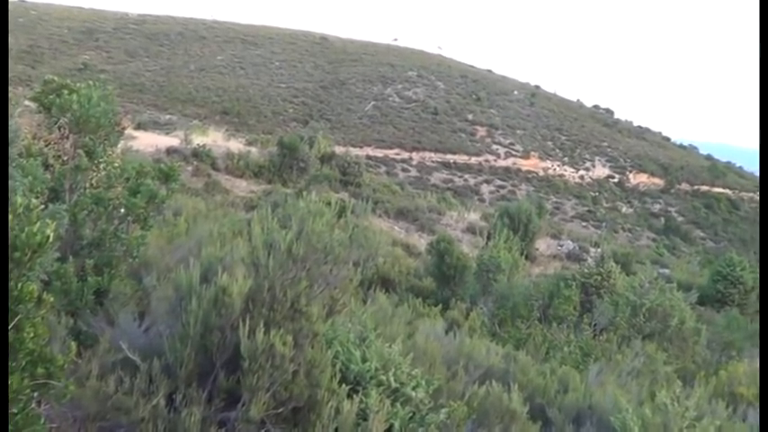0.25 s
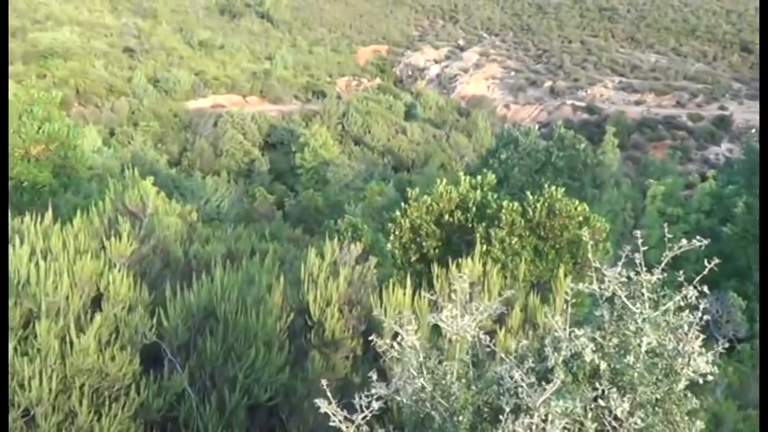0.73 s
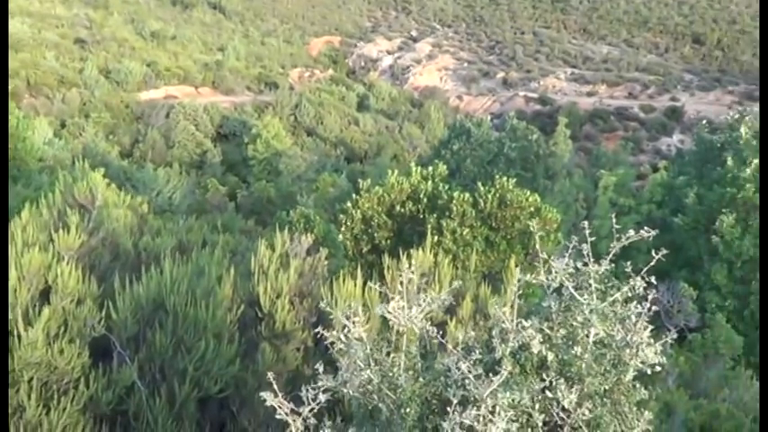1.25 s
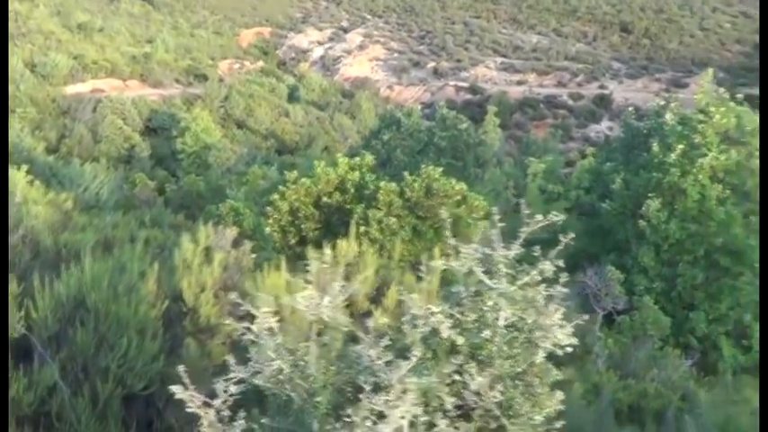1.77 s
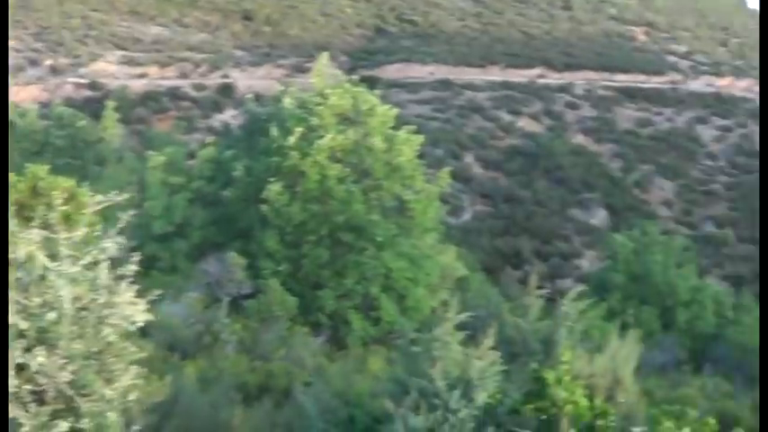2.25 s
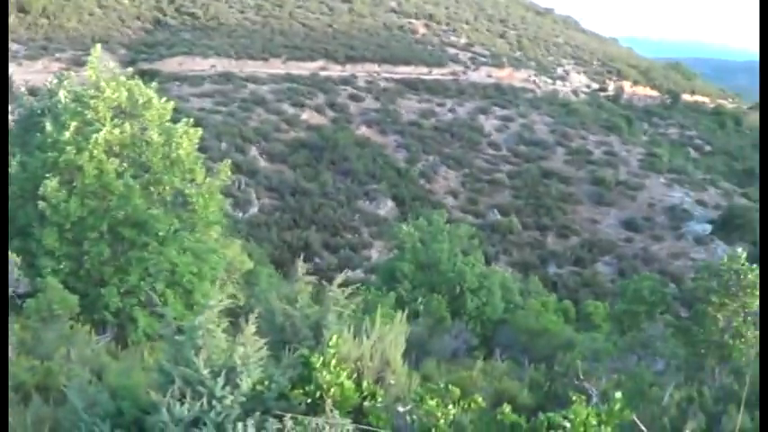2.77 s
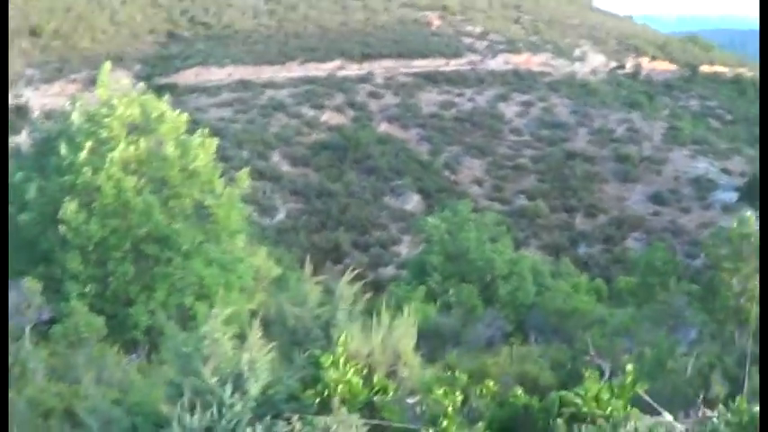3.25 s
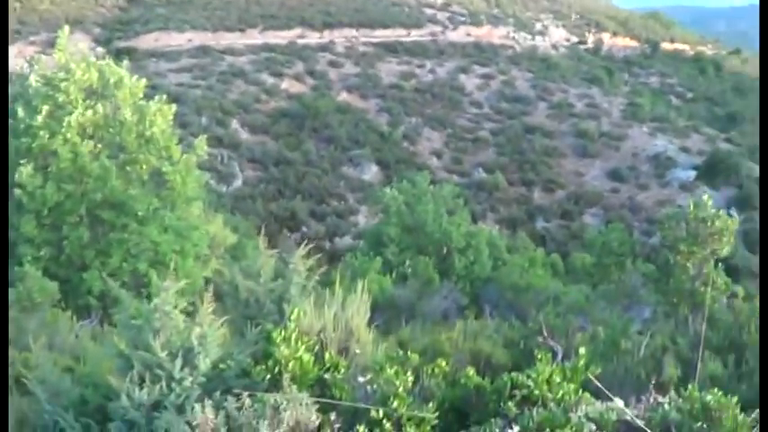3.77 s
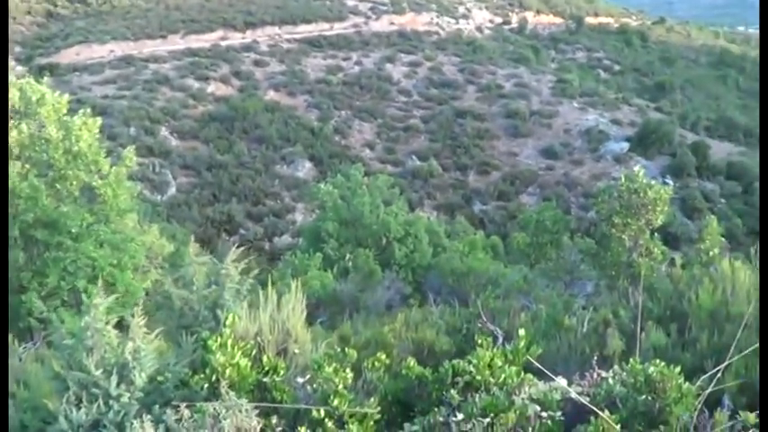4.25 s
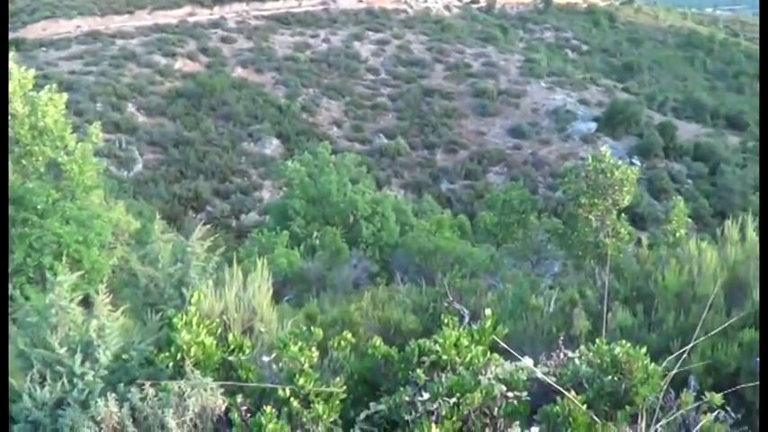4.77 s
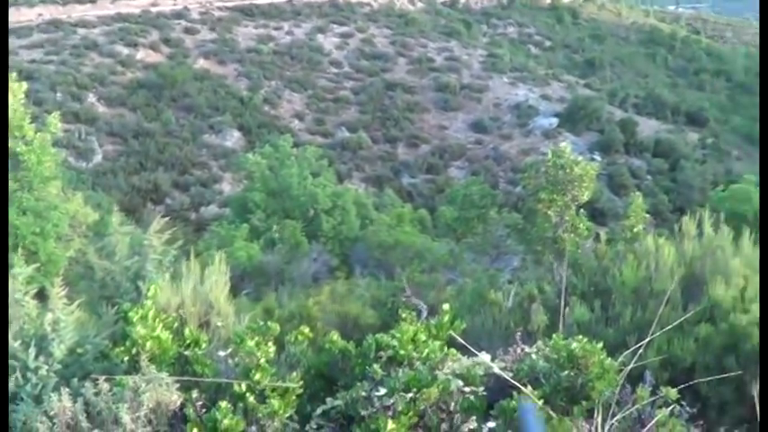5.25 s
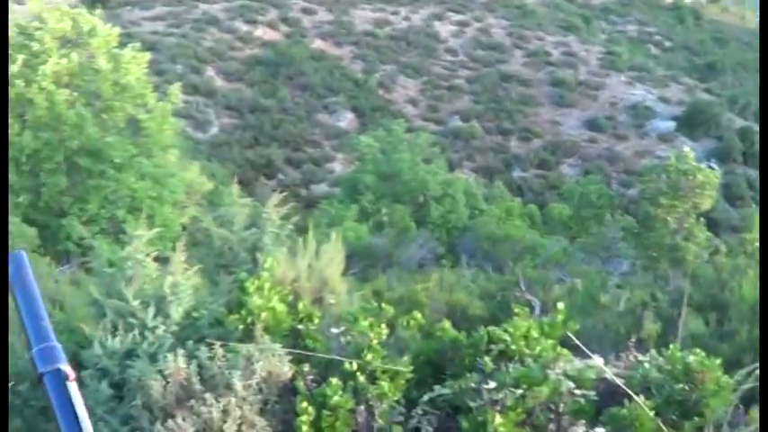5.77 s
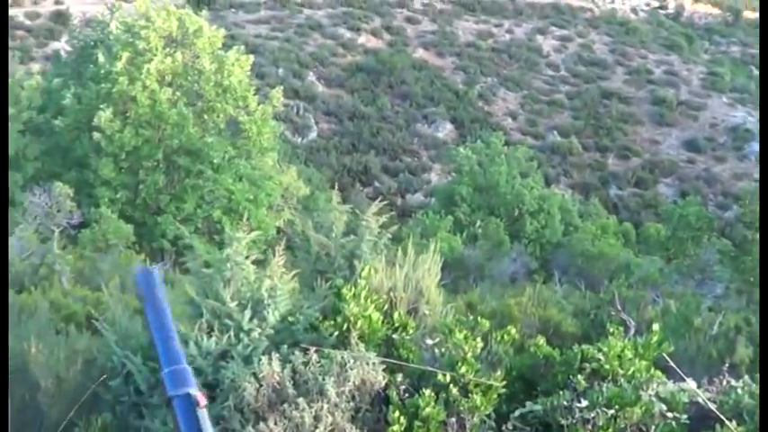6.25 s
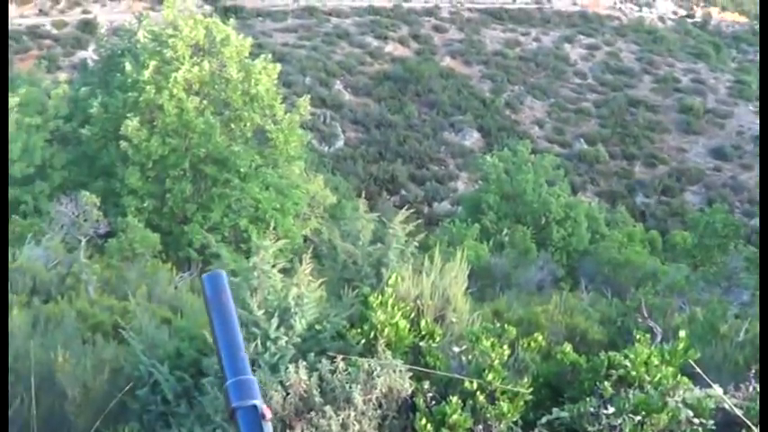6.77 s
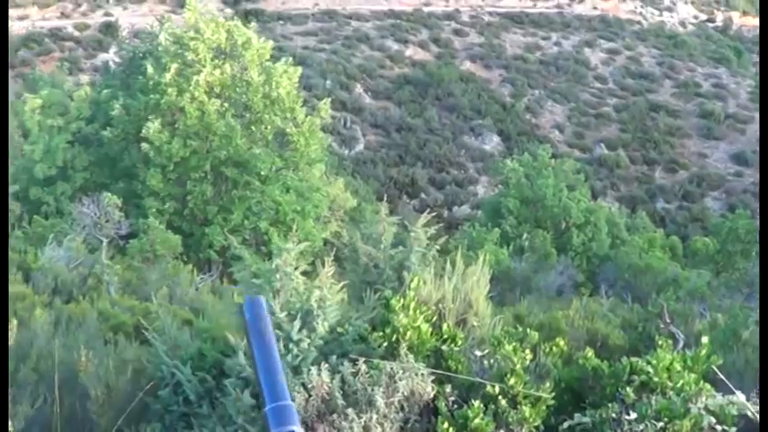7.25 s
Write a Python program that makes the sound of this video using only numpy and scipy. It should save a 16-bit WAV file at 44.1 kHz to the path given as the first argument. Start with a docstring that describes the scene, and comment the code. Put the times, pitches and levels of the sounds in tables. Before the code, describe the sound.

Hunting hounds give tongue on an open hillside. Short, gliding, almost whistled yelps sound singly, then crowd together from the middle onward, joined by lower, raspy bays. Collar bells jingle lightly among them. A handheld camera microphone catches low wind buffeting early, leaves brushing and sharp twig cracks in clusters, a few soft knocks, faint hiss and a very high thin whine. Sparse echoes die quickly off the slope.

```python
"""Hounds give tongue on a scrubby hillside: high yelps, sparse at first, then overlapping with hoarse bays.
Yelps are gliding tones with ragged overtones; bays add half-multiple lines, throat flap and breath.
Collar bells ring as struck modes, small birds whistle; a sparse decaying echo returns from the slope.
Shaped noise makes wind gusts, handling rumble, brush, twigs and hiss; a camera whine pulses thinly."""
import sys
import numpy as np
from scipy import signal
from scipy.fft import rfft, irfft, next_fast_len
from scipy.io import wavfile
from scipy.ndimage import map_coordinates

SR = 44100
rng = np.random.default_rng(int(sys.argv[2]) if len(sys.argv) > 2 else 0)


def file_out(sig):
    """Save sig as 16-bit WAV at sys.argv[1]."""
    # one column per channel
    cols = np.atleast_2d(sig).T
    # limit, then scale
    lim = np.clip(cols, -1, 1)
    pcm = np.round(lim * 32767).astype(np.int16)
    wavfile.write(sys.argv[1], SR, pcm)


N = 331632
TIME = np.arange(N) / SR
STEP_S = 0.365  # background level steps up here and the whine sets in

# Spectrum of snapping twigs and dry crackle. Each row: frequency in Hz, gain in dB.
SNAP_SPECTRUM = [(200, -1.5), (1000, 8.5), (2500, 5.5), (5000, -2.5), (8500, 0), (12000, -5), (17000, -38)]


def amp(db):
    """Decibels to gain."""
    return 10 ** (np.asarray(db) / 20)


def unit(x):
    """Scales to rms 1."""
    return x / np.sqrt(np.mean(x ** 2) + 1e-20)


def read(points, hz):
    """Reads a spectrum on a log-frequency axis."""
    f, value = np.transpose(points)
    return np.interp(np.log(hz + 1), np.log(f + 1), value)


def add(mix, start_s, sound):
    """Lays a sound into the mix at start_s."""
    part = mix[max(round(start_s * SR), 0):][:len(sound)]
    part += sound[:len(part)]


def colour(x, points):
    """Filters by a spectrum of (Hz, dB) points."""
    length = x.shape[-1]
    n = next_fast_len(length)
    gain = amp(read(points, np.fft.rfftfreq(n, 1 / SR)))
    return irfft(rfft(x, n) * gain, n)[..., :length]


def wander(n, rate_hz):
    """Smooth chance of rms about 1, with rate_hz random knots a second."""
    knots = rng.standard_normal(4096)
    return map_coordinates(knots, [np.arange(n) * rate_hz / SR], order=3, mode="wrap")


def drift(n, rate_hz):
    """Randomly turning, swelling phasor of rms about 1: smears a line over about rate_hz."""
    return (wander(n, rate_hz) + 1j * wander(n, rate_hz)) / np.sqrt(2)


def ring(modes, t, uneven_db=3):
    """Dying modes of a struck thing, excited and detuned differently by every blow."""
    out = 0
    for hz, db, t60_s in modes:
        level_chance, pitch_chance = rng.standard_normal(2)
        decay = amp(db + uneven_db * level_chance - 60 * t / t60_s)
        out = out + decay * np.sin(2 * np.pi * hz * (1 + 0.0043 * pitch_chance) * t)
    return out


def noise_pair(points):
    """Coloured stereo noise of rms 1; the side-to-mid ratio sets left-right likeness by frequency."""
    # Likeness of the two microphone ports. Each row: frequency in Hz, left-right correlation 0-1.
    port_likeness = [(30, 0.98), (120, 0.48), (280, 0.06), (700, 0.09), (2000, 0.49), (8000, 0.84),
                     (12000, 0.99)]
    mid, side = rng.standard_normal((2, N))
    side_db = [(hz, 10 * np.log10((1.0001 - min(c, 1)) / (1 + c))) for hz, c in port_likeness]
    side = colour(side, side_db)
    return unit(colour(np.array([mid + side, mid - side]), points))


def air():
    """Steady open-air background and hiss, quieter and duller in the first moments."""
    # Background spectrum. Each row: frequency in Hz, gain in dB.
    air_spectrum = [(20, 14), (100, 2.5), (300, 2.5), (700, 1.5), (1400, -1), (2500, -3.5), (5000, -6),
                    (9000, -10), (14000, -9.5), (18000, -13)]
    # Extra filter before the step. Each row: frequency in Hz, gain in dB.
    early_tilt = [(100, 0), (1000, 4), (3000, -3.5), (9000, -8.5), (15000, -5)]
    air_db, early_db = -55, -61  # early_db applies ahead of the tilt
    hiss = noise_pair(air_spectrum)
    early = amp(early_db) * colour(hiss, early_tilt)
    return np.where(TIME > STEP_S, amp(air_db) * hiss, early)


def wind_and_handling(lump_db=2.0):
    """Wind gusts, then deeper rumbles of the camera being handled: lumpy low noise, fast rise, hold and decay."""
    # Low-frequency spectrum at the reference centre. Each row: frequency in Hz, gain in dB.
    rumble_spectrum = [(15, -35), (25, -41), (40, 3), (66, 8), (107, 8), (163, 1.5), (250, -12.5),
                       (400, -23.5), (700, -34.5), (1500, -60)]
    # Wind gusts, then deeper handling rumbles. Each row: start in seconds,
    # time from start to decay in seconds, level in dB, rumble centre in Hz.
    swell_rows = [(0.363, 1.26, -34.5, 106.5), (1.08, 0.023, -30, 105), (1.245, 0.3, -41, 140),
                  (1.645, 0.14, -40, 101), (3.256, 0.076, -48, 119), (4.83, 0.088, -57, 70),
                  (5.552, .55, -49.5, 79.4), (6.685, 0.27, -41.5, 81), (6.9, 0.57, -49.5, 75.6)]
    rise_s, fall_s, calm_db, reference_hz = 0.018, 0.11, -69.5, 100
    calm_gain = amp(calm_db) * np.where(TIME > STEP_S, 1, 0.4)
    out = calm_gain * noise_pair(rumble_spectrum)
    for start_s, hold_s, db, centre_hz in swell_rows:
        rise = np.clip((TIME - start_s) / rise_s, 0, 1)
        fall = np.exp(-np.maximum(TIME - start_s - hold_s, 0) / fall_s)
        shifted = [(hz * centre_hz / reference_hz, band_db) for hz, band_db in rumble_spectrum]
        out += amp(db) * rise * fall * noise_pair(shifted)
    return amp(lump_db * wander(N, 22)) * out


def rustle(clump_db=2):
    """Dry leaves and stems brush past each other: strokes of swish, grainy crackle and dull scrape."""
    # Leafy swish spectrum. Each row: frequency in Hz, gain in dB.
    swish_spectrum = [(60, -22), (250, -14), (700, -17.5), (2000, -2.5), (5000, 9.5), (9000, 11),
                      (12500, 2.5), (17000, -22)]
    # Dull scrape spectrum. Each row: frequency in Hz, gain in dB.
    scrape_spectrum = [(60, -16), (140, -1.5), (300, 4.5), (650, 0), (1500, 2), (4000, -21), (12000, -43)]
    # Strokes. Each row: middle in seconds, half length (to 1/e power) in seconds,
    # leafy swish, dry crackle and dull scrape levels in dB.
    stroke_rows = [(2.253, 0.32, -70, -60.5, -57), (2.91, 0.12, -62, -57.5, -55.5),
                   (3.3, 0.17, -50, -47.5, -54), (3.587, 0.056, -51.5, -48, -58),
                   (3.88, 0.12, -55, -55.5, -82), (4.286, 0.22, -61.5, -64, -79),
                   (5.29, 0.052, -45.5, -43, -65), (5.58, 0.27, -54.5, -54.5, -55.5),
                   (6.39, 0.027, -52, -47, -46), (6.727, 0.39, -58.5, -53, -53),
                   (7.24, 0.38, -60, -62, -64)]
    leaves_db, leaves_start_s = -65.5, 1.9  # leaves stirring between strokes
    grains_per_s = 500
    grain_gain = amp(6 * np.minimum(rng.exponential(1, N), 3.8))
    grains = (rng.random(N) < grains_per_s / SR) * grain_gain
    burst = signal.oaconvolve(grains, np.hanning(48), "same")
    crackle = unit(colour(burst * rng.standard_normal(N), SNAP_SPECTRUM))
    power = amp(leaves_db) ** 2 * (TIME > leaves_start_s)
    for middle_s, half_s, *levels_db in stroke_rows:
        swell = np.exp(-((TIME - middle_s) / half_s) ** 2)
        power = power + amp(levels_db)[:, None] ** 2 * swell
    leafy, dry_stems, dull = np.sqrt(power) * amp(clump_db * wander(N, 45))
    swish = leafy * noise_pair(swish_spectrum)
    scrape = dull * noise_pair(scrape_spectrum)
    return swish + dry_stems * crackle + scrape


def snaps(crack_s=0.0025, rise_s=0.00023):
    """A twig breaks with a short noise crack, and may ring in modes scaled by its size."""
    # Snapping twigs. Each row: start in seconds, crack peak in dB before stereo gain, ring amount 0-1.
    snap_rows = [(2.087, -53, 0.2), (2.884, -43, 0.22), (3.133, -33.5, 0.07), (3.173, -38, .1),
                 (3.335, -36.5, 0.1), (3.348, -35, .05), (3.48, -30, 0.13), (3.49, -35, 0.23),
                 (3.565, -29.5, 0.01), (3.742, -35.5, .05), (3.776, -46, 0.64), (3.795, -46.5, 0.67),
                 (5.203, -37, 0.07), (5.223, -34, 0.07), (5.259, -36, 0.06), (5.275, -40, 0.2),
                 (5.355, -41, 0.23), (5.526, -39, 0.12), (5.637, -33, 0.06), (5.694, -39, 0.05),
                 (5.84, -29, 0), (6.042, -33, 0.01), (6.07, -32.5, 0.01), (6.279, -25.5, 0),
                 (6.389, -28, 0.01), (6.413, -27.5, 0), (6.485, -29.5, 0), (6.665, -33, 0.04),
                 (6.84, -30.5, 0.02)]
    # Twig modes at size 1. Each row: frequency in Hz, level in dB, t60 in seconds.
    twig_modes = [(4900, 2, 0.12), (5260, 19.5, 0.023), (7460, 5, 0.07), (9050, 17.5, 0.036),
                  (11200, -15, 0.056), (12300, 7, 0.045)]
    out, t = np.zeros(N), np.arange(4096) / SR
    envelope = np.exp(-t / crack_s) * (1 - np.exp(-t / rise_s))
    for start_s, db, ring_amount in snap_rows:
        crack = colour(rng.standard_normal(len(t)) * envelope, SNAP_SPECTRUM)
        crack = crack / abs(crack).max()
        size = rng.uniform(0.9, 1.1)
        ringing = 0.57 * ring_amount * ring(twig_modes, t / size)
        add(out, start_s, amp(db) * (crack + ringing))
    return out


def knocks(decay_s=0.00034, thud_hz=230):
    """Soft low knocks near the microphone: heavily damped sine pushes."""
    # Knocks. Each row: start in seconds, drive in dB before damping.
    knock_rows = [(2.888, -16.5), (3.337, -11.5), (3.346, -11), (3.425, -25)]
    out, t = np.zeros(N), np.arange(4096) / SR
    thud = np.sin(2 * np.pi * thud_hz * t) * np.exp(-t / decay_s)
    for start_s, db in knock_rows:
        add(out, start_s, amp(db) * thud)
    return out


def whistles():
    """Short bird notes, thin whistles and bell partials as gliding sines; the briefest are the least steady."""
    # Short bird notes, thin whistles, and bell partials near 5 and 9 kHz (rows at 7.03 and 7.069).
    # Each row: start in seconds, length in seconds, start and end pitch in Hz,
    # peak in dB before stereo gain.
    note_rows = [(.07, 0.3, 4450, 3950, -79), (.459, .019, 1810, 1840, -47), (.654, .017, 1760, 1870, -47),
                 (1.019, 0.023, 4100, 4600, -54), (1.712, 0.046, 4040, 3830, -56),
                 (1.92, 0.097, 9700, 9600, -68), (1.97, .077, 4730, 4690, -58.5),
                 (2.385, .027, 10500, 8200, -55.5), (2.514, 0.023, 7500, 8600, -55.5),
                 (2.655, 0.035, 9230, 8000, -51.5), (3.125, .03, 9700, 9600, -58),
                 (3.202, .022, 7400, 8400, -51), (3.509, 0.026, 7900, 8100, -36),
                 (4.277, 0.028, 1790, 1740, -37), (4.643, 0.044, 4680, 4100, -53),
                 (4.683, 0.031, 3530, 3770, -49.5), (7.022, 0.012, 1710, 1880, -36.5),
                 (7.03, 0.093, 5010, 4900, -46), (7.069, 0.044, 8950, 8940, -47)]
    out = np.zeros(N)
    for start_s, length_s, start_hz, end_hz, db in note_rows:
        n = int(length_s * SR)
        waver = 0.0004 / length_s
        hz = np.linspace(start_hz, end_hz, n) * (1 + waver * wander(n, 346))
        tone = np.sin(2 * np.pi * np.cumsum(hz) / SR)
        add(out, start_s, amp(db) * signal.windows.tukey(n, 0.5) * tone)
    return out


def bells(rebound_db=-7, gap_s=0.068):
    """Collar bells: each shake is one clapper strike and two softer rebounds on decaying modes."""
    # Bell modes. Each row: frequency in Hz, level in dB, t60 in seconds.
    bell_modes = [(1760, -3, 0.87), (1800, 10, 0.14), (3740, -31, 0.17), (4720, -9.5, 1), (4905, 1.5, 0.18),
                  (7700, -7, 0.15), (8830, -33, 0.11)]
    # Shakes. Each row: start in seconds, strike drive in dB before the mode levels.
    shake_rows = [(.8, -67.5), (1.171, -69.5), (1.419, -58), (1.681, -58.5), (1.972, -75.5), (3.498, -54),
                  (3.68, -54), (3.972, -56.5), (4.16, -55), (4.29, -53.5), (4.489, -52), (4.669, -62.5),
                  (4.761, -57.5), (4.921, -53), (5.19, -52.5), (5.362, -53), (5.982, -55.5), (6.663, -50),
                  (7.48, -64.5)]
    out, t = np.zeros(N), np.arange(SR // 2) / SR
    for start_s, db in shake_rows:
        delays_s = np.cumsum(gap_s * rng.uniform(0.37, 1.1, size=2))
        add(out, start_s, amp(db) * ring(bell_modes, t))
        for delay_s in delays_s:
            add(out, start_s + delay_s, amp(db + rebound_db) * ring(bell_modes, t))
    return out


def hillside(x, build_s=0.0022):
    """Sparse stereo echoes from bushes and the far slope, each band dying at its own speed."""
    # Echo decay. Each row: frequency in Hz, t60 in seconds.
    slope_decay = [(300, 0.96), (1400, 0.95), (3000, 1), (9000, 0.13)]
    taps_per_s = 1500
    taps = rng.standard_normal((3, SR)) * (rng.random((3, SR)) < taps_per_s / SR)
    stereo_taps = taps[0] + 0.53 * taps[1:]  # shared part plus one of its own per side
    hz, t, bands = signal.stft(stereo_taps, SR, nperseg=256)
    decay = amp(-60 * t / read(slope_decay, hz)[:, None]) * (1 - np.exp(-t / build_s))
    tail = signal.istft(bands * decay, SR, nperseg=256)[1]
    tail = tail / np.linalg.norm(tail[0])
    return signal.fftconvolve(x[None], tail, axes=1)[:, :N]


def call(length_s, pitches_hz, crest, droop_db):
    """Pitch, gate and swell of one call: pitch bends along one arc, effort rises to a crest and sinks."""
    attack_s, release_s = 0.012, 0.0097
    t = np.arange(0, length_s, 1 / SR)
    u = t / length_s
    hz = np.polyval(np.polyfit([0, 0.5, 1], pitches_hz, 2), u)
    gate = np.clip(np.minimum(t / attack_s, (length_s - t) / release_s), 0, 1)
    return hz, gate, amp(-droop_db * (u - crest) ** 2)


def two_paths(sound, share=0.25, delay_s=0.014):
    """The call also arrives a moment later off the ground, and beats with itself as its pitch glides."""
    lag = np.zeros(int(delay_s * rng.uniform(0.6, 1.4) * SR))
    return np.r_[sound, lag] + share * np.r_[lag, sound]


def bay(start_s, length_s, first_hz, middle_hz, last_hz, db, crest, droop_db, over_db, noise_db,
        jitter=0.016, quaver=0.01046, shimmer=0.44, tone_trim_db=-1, overtone_trim_db=-3,
        rasp_trim_db=-1.0, half_db=-4, breath_db=-12, patchy_db=5.0):
    """Chest voice about an octave lower; chaotic folds add half lines, and loose throat tissue chops the voice."""
    # Throat resonances of a bay. Each row: frequency in Hz, gain in dB.
    bay_throat = [(300, -33), (560, -4), (850, 1), (1150, -1.5), (1750, 1), (2550, -11), (3050, -27),
                  (3800, -20.5), (5000, -28), (8000, -35), (13000, -65)]
    hz, gate, swell = call(length_s, (first_hz, middle_hz, last_hz), crest, droop_db)
    n = len(hz)
    unsteady = 1 + jitter * wander(n, 374) + quaver * wander(n, 49)
    phase = 2 * np.pi * np.cumsum(hz * unsteady) / SR
    flap_hz = 82 * (1 + 0.13 * wander(n, 70))
    flap = np.sin(2 * np.pi * np.cumsum(flap_hz) / SR)

    # the fundamental needs full effort: swell enters it twice
    tone = amp(db + tone_trim_db) * gate * swell ** 1.07
    tone = tone * (1 + shimmer * wander(n, 142.5)) * np.sin(phase)
    overtones = 0
    for k in range(2, 13):
        strength = amp(read(bay_throat, k * hz)) * (1 + 0.23 * wander(n, 129))
        overtones += strength * np.sin(k * phase)
    voiced = tone + amp(over_db + overtone_trim_db) * overtones
    voiced = np.sqrt(2) * (1 + 0.35 * flap) * voiced

    chaos = 0
    for k in range(3, 26):  # half multiples; the odd ones are weaker, and all come and go
        slip = wander(n, 60 + 8 * k)
        line_db = read(bay_throat, k * hz / 2) + half_db * (k % 2) + patchy_db * wander(n, 47)
        chaos += amp(line_db) * np.sin(k * phase / 2 + slip + rng.uniform(0, 2 * np.pi))
    breath = unit(colour((1 + np.cos(phase)) * rng.standard_normal(n), bay_throat))
    rasp = unit((1 + 0.45 * flap) * (unit(chaos) + amp(breath_db) * breath))
    return start_s, gate * swell * (voiced + amp(noise_db + rasp_trim_db) * rasp)


def yelp(start_s, length_s, first_hz, middle_hz, last_hz, db, crest, droop_db, octave_db, high_db,
         jitter=0.01, quaver=0.0046, shimmer_db=2.2, flutter_db=1.4, flicker_db=3,
         tone_trim_db=-3.5, overtone_trim_db=-4.0):
    """A nearly pure falsetto; the higher an overtone, the more ragged it arrives through the scrub."""
    # Throat colour of a yelp's overtones. Each row: frequency in Hz, gain in dB.
    yelp_throat = [(1500, 23), (2800, -1.5), (3400, -8), (4300, -9.5), (5500, -11.5), (7500, -21.5),
                   (9300, -36), (10500, -43), (13000, -54)]
    fray_calm_db, fray_excited_db, full_cry_s = -33, -20.5, 5.5  # noise around the tone
    hz, gate, swell = call(length_s, (first_hz, middle_hz, last_hz), crest, droop_db)
    n = len(hz)
    unsteady = 1 + jitter * wander(n, 338.0) + quaver * wander(n, 65.7)
    turn = np.exp(2j * np.pi * np.cumsum(hz * unsteady) / SR)
    fray = amp(fray_excited_db if start_s > full_cry_s else fray_calm_db)
    tone_db = db + tone_trim_db + shimmer_db * wander(n, 123.7) + flutter_db * wander(n, 59.5)
    tone = amp(tone_db) * turn * (1 + fray * drift(n, 592))
    overtones = 0
    for k in range(2, 9):
        ragged = min(0.19 * k + 2 * fray, 0.9)
        smear = np.sqrt(1 - ragged ** 2) + ragged * drift(n, 60 * k)
        strength_db = octave_db if k == 2 else high_db
        line_db = strength_db + read(yelp_throat, k * hz) + flicker_db * wander(n, 45.2)
        overtones += amp(line_db) * smear * turn ** k
    voice = swell * tone + np.sqrt(swell) * amp(overtone_trim_db) * overtones
    return start_s, two_paths(np.sqrt(2) * gate * voice.imag)


def scene(left_db=3.5, right_db=4.5):
    """Hounds, bells and birds with slope echo; brush, twigs, knocks, wind, handling and air nearby."""
    # Yelps and parts of yelps; the 5.015 row is a half-pitch line of a bay.
    # Each row: start in seconds, length in seconds, pitch at start, middle and end in Hz,
    # fundamental in dB before trims, crest place 0-1, droop one call length from the crest in dB,
    # octave overtone and higher overtones in dB before trims and throat.
    yelp_rows = [(0.178, 0.13, 824, 880, 835, -53.5, 0.0, 14, -94, -82),
                 (0.724, 0.044, 860, 866, 836, -48, 0.0, 48, -91, -79),
                 (0.881, 0.038, 905, 1323, 1510, -46, 0.87, 2, -65, -67),
                 (0.899, 0.13, 1476, 1418, 1255, -33, 0.37, 96, -58, -57),
                 (1.004, 0.023, 1160, 715, 730, -38, 0.03, 25, -70, -75),
                 (1.145, 0.052, 770, 858, 870, -54, 0.02, 31, -77, -77),
                 (1.382, 0.14, 1626, 1399, 1374, -32.6, 0.42, 38, -46.5, -54),
                 (1.781, 0.019, 788, 834, 810, -48, 1.0, 15, -83, -77),
                 (1.81, 0.13, 1447, 1264, 1206, -22.5, 0.44, 45, -44, -47.5),
                 (2.289, 0.057, 1330, 1343, 1325, -22.5, 0.0, 14.5, -44, -55),
                 (2.341, 0.056, 1167, 1375, 1220, -23.5, 0.39, 73, -36, -49),
                 (2.534, 0.12, 1532, 1452, 1366, -23.4, 0.95, 3.5, -54.5, -52),
                 (2.988, 0.15, 1214, 1300, 1373, -31, 0.38, 50, -40.5, -46),
                 (3.241, 0.11, 1603, 1353, 1370, -29, 0.37, 47, -58, -53),
                 (3.341, 0.054, 1518, 1576, 1730, -36, 0.97, 28, -60, -64),
                 (3.722, 0.18, 1137, 1234, 1503, -34, 0.13, 13, -51, -43.5),
                 (3.851, 0.093, 1348, 1745, 1520, -30.5, 0.59, 28, -56, -47.5),
                 (3.894, 0.14, 1516, 1320, 1510, -31.5, 0.66, 5, -50.5, -50),
                 (4.024, 0.13, 1282, 1414, 1387, -24, 1.0, 11, -53, -49.5),
                 (4.152, 0.14, 1313, 1358, 1320, -24, 0.18, 17, -47.5, -45.5),
                 (4.259, 0.14, 1265, 1535, 1470, -31.5, 0.04, 14, -57, -65),
                 (4.378, 0.12, 1444, 1377, 1437, -21, 0.05, 34, -40.5, -47),
                 (4.437, 0.077, 646, 1269, 1337, -29.5, 0.82, 48, -46.5, -47.5),
                 (4.516, 0.15, 1410, 1499, 1513, -27.5, 0.37, 54, -47.5, -44),
                 (4.844, 0.17, 1232, 1114, 1310, -26, 0.52, 50, -43, -51),
                 (5.015, 0.092, 1178, 1037, 1257, -24.5, 0.57, 19, -79, -73),
                 (5.099, 0.15, 1099, 1384, 1272, -19.5, 1, 17, -42.5, -48),
                 (5.315, 0.11, 1172, 1200, 1270, -27, 0.12, 6, -44.5, -49),
                 (5.383, 0.12, 1370, 1664, 1560, -22.5, 0.39, 25, -44, -42),
                 (5.552, 0.076, 1478, 1490, 1146, -26, 0.74, 32, -51, -55),
                 (5.621, 0.17, 1194, 1312, 1157, -23.5, 0.24, 53, -47.5, -48),
                 (5.785, 0.16, 1085, 1232, 1163, -42.5, 0.9, 9, -51, -59),
                 (5.848, 0.07, 1474, 1310, 1254, -18.5, 0.19, 34, -33.5, -41.5),
                 (5.883, 0.071, 1365, 1617, 1355, -22.5, 0.2, 8, -36.5, -57),
                 (5.939, 0.17, 1280, 1130, 1370, -27.5, 0.46, 66, -45.5, -47.5),
                 (6.121, 0.101, 1625, 1616, 1710, -21.5, 1.0, 2, -47.5, -41),
                 (6.202, 0.096, 1550, 1449, 1250, -26, 0.8, 46, -51, -50),
                 (6.295, 0.088, 1261, 1334, 1396, -23, 0.55, 58, -48, -46),
                 (6.511, 0.082, 1370, 1331, 1084, -16, 0.5, 78, -37, -43.5),
                 (6.597, 0.056, 1831, 1230, 1210, -21.5, 0.17, 55, -49, -49),
                 (6.612, 0.094, 1183, 1397, 1535, -26, 0.0, 2.5, -46, -44.5),
                 (6.646, 0.11, 1075, 1121, 1151, -27, 0.41, 31, -43.5, -56),
                 (6.75, 0.067, 1715, 1763, 1743, -32, 0.51, 84, -34.5, -31),
                 (6.888, 0.085, 1755, 1610, 1460, -34.5, 0.16, 6, -56, -37.5),
                 (7.126, 0.054, 952, 1320, 1203, -34, 1, 8, -34.5, -41),
                 (7.222, 0.14, 1183, 1254, 1335, -29.5, 0.4, 25, -42.5, -47.5),
                 (7.253, 0.21, 1329, 1473, 1377, -30.8, 0.7, 9, -46, -37.5)]
    # Hoarse bays; the first row is a brief rough break within a yelp.
    # Each row: start in seconds, length in seconds, pitch at start, middle and end in Hz,
    # fundamental in dB before trims, crest place 0-1, droop one call length from the crest in dB,
    # overtones in dB before trims and throat, rasp in dB before trims.
    bay_rows = [(2.327, 0.045, 559, 683, 680, -61.0, 0.01, 54, -28, -36.5),
                (4.957, 0.15, 602, 679.4, 675, -29, 0.47, 65, -66, -28.5),
                (5.231, 0.11, 685, 662, 580, -32, 0.38, 49, -40, -32),
                (5.656, 0.18, 551.6, 649, 571, -34, 0.38, 34, -37.5, -38),
                (6.017, 0.19, 665.6, 736, 814, -45, 0.58, 48, -38, -36.5),
                (6.296, 0.15, 507.5, 588, 567, -38.5, 0.74, 28, -62, -37),
                (6.559, 0.083, 484, 659, 738, -39.5, 0.42, 56, -33, -37),
                (6.641, 0.13, 693, 648, 918, -43.5, 0.78, 31, -39.5, -41),
                (6.786, 0.16, 840, 902, 1120, -35, 0.61, 46, -47, -36),
                (7.157, 0.093, 608, 616, 749, -25.5, 0.49, 21, -63, -32),
                (7.238, 0.14, 697, 605, 1060, -54.5, 0.08, -8, -61, -57),
                (7.378, 0.13, 926, 733, 720, -44, 0, 24, -60, -43.5)]
    # A hound radiates little below its lowest note. Each row: frequency in Hz, gain in dB.
    chest_cut = [(100, -40), (330, -21), (450, -6.5), (540, 0.5), (1000, 0)]
    # echo drive: sparse far yelps, nearer yelps, full pack
    far_echo_db, near_echo_db, pack_echo_db = -12.5, -26.5, -18.5
    nearer_s, pack_s = 1.7, 4.4
    hounds = np.zeros(N)
    for row in yelp_rows:
        add(hounds, *yelp(*row))
    for row in bay_rows:
        add(hounds, *bay(*row))
    far = colour(hounds, chest_cut) + bells() + whistles()
    direct = (far + snaps() + knocks()) * amp([[left_db], [right_db]])
    echo_db = np.select([TIME < nearer_s, TIME < pack_s], [far_echo_db, near_echo_db], pack_echo_db)
    return direct + hillside(far * amp(echo_db)) + rustle() + wind_and_handling() + air()


def record(dry, whine_db=-61, buzz=0.61):
    """Adds the camera's line whine, pulsing at its field rate from STEP_S on, then limits the band."""
    whine_hz, field_hz, edge_hz = 15625, 50, 18300
    field = 2 * np.pi * field_hz * TIME
    pulsing = 1 + buzz * sum(np.cos(k * field + k * k) / k for k in range(1, 4))
    carrier = np.sqrt(2) * amp(whine_db) * np.sin(2 * np.pi * whine_hz * TIME)
    whine = (TIME > STEP_S) * pulsing * carrier
    lowpass = signal.firwin(511, edge_hz, window=("kaiser", 9), fs=SR)
    return signal.oaconvolve(dry + whine, lowpass[None], "same")


dry = scene()
out = record(dry)
file_out(out)
```